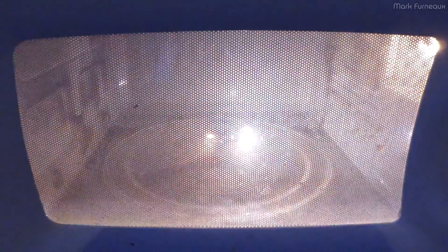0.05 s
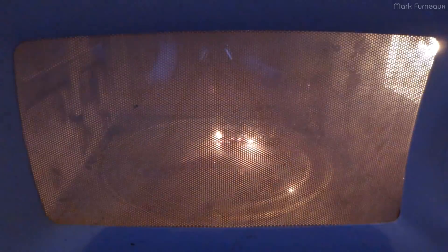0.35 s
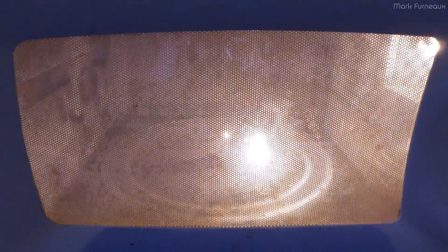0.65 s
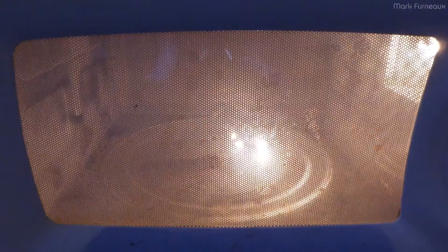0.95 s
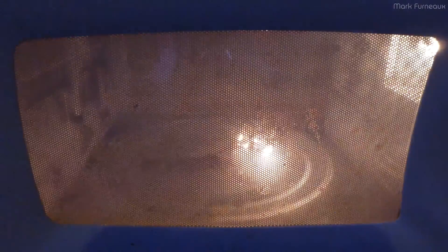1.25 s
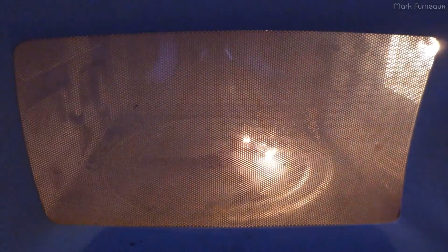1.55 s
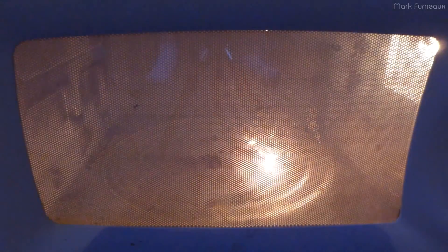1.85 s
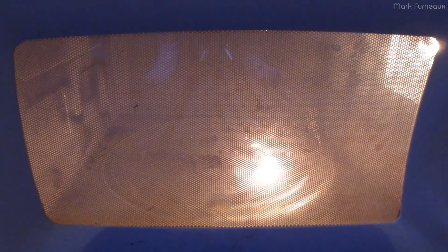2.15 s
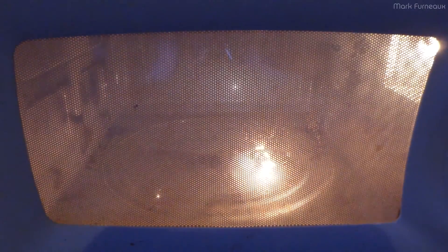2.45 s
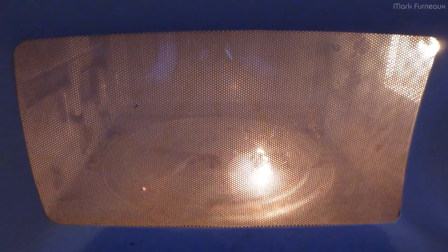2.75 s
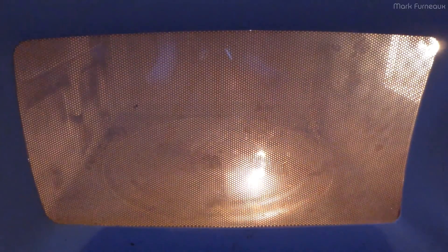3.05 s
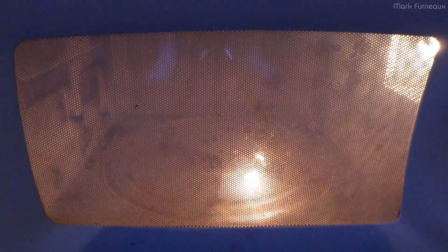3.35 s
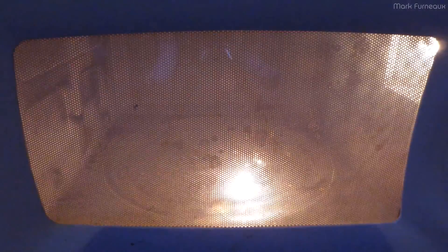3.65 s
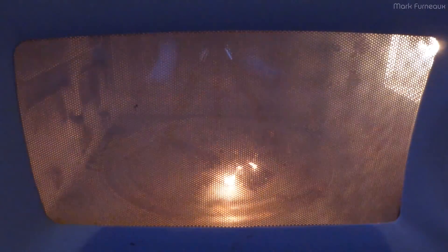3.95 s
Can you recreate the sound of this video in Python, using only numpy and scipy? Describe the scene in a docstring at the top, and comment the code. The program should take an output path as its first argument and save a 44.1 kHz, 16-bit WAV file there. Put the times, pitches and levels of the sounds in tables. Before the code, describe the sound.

Sparks crackle loudly inside a microwave oven right at the start, close up, each snap sizzling and ringing the steel interior. A shorter burst comes at about 0.5 seconds and another from 1.0 to 1.2. The fan rushes and the motor hums throughout. A faint tick follows at 2.5 seconds, then one hard pop near 3.5, and two small spits just before the end at 4 seconds.

```python
"""A burst of sparks crackles in a microwave oven, close up, over its rushing fan and the hum of its
motor and transformer. Metal on the turntable arcs in short bursts, one spark per mains cycle.
Each spark cracks, sizzles, thumps and rings the steel cavity, whose modes are struck differently as
the turntable carries the metal round. Later the metal only spits and gives one hard pop."""
import sys
import numpy as np
from scipy import signal
from scipy.fft import rfft, irfft, next_fast_len
from scipy.io import wavfile
from scipy.ndimage import uniform_filter1d, minimum_filter1d, map_coordinates

SR = 44100
rng = np.random.default_rng(int(sys.argv[2]) if len(sys.argv) > 2 else 0)


def generate_wav(signal):
    """Clip the signal to [-1, 1] and save it as 16-bit WAV at the path in sys.argv[1]."""
    frames = np.transpose(np.atleast_2d(signal))
    scaled = np.clip(frames, -1, 1) * 32767
    pcm = np.round(scaled).astype(np.int16)
    wavfile.write(sys.argv[1], SR, pcm)


N = 176400


def amp(db):
    """Decibels to gain."""
    return 10 ** (np.asarray(db) / 20)


def unit_rms(x):
    """Scale to rms 1."""
    return x / np.sqrt(np.mean(x ** 2) + 1e-20)


def wobble(rate):
    """A smooth random modulator with `rate` knots a second."""
    knots = rng.standard_normal(int(N * rate / SR) + 4)
    return map_coordinates(knots, [np.arange(N) * rate / SR])


def noise(colour, size, resonances=()):
    """Noise of rms 1, shaped by an EQ curve and optional bell resonances."""
    hz = np.fft.rfftfreq(size, 1 / SR)
    curve_hz, curve_db = np.transpose(colour)
    db = np.interp(np.log(hz + 1), np.log(curve_hz + 1), curve_db)
    for centre, width, lift in resonances:
        db += lift / (1 + (2 * (hz - centre) / width) ** 2)
    return unit_rms(irfft(rfft(rng.standard_normal(size)) * amp(db), size))


def add(track, start_s, sound):
    """Mix a sound into the track at its cue."""
    part = track[round(start_s * SR):][:len(sound)]
    part += sound[:len(part)]


def attack(t, rise_s=0.00012):
    """An onset envelope, click-sharp by default."""
    return 1 - np.exp(-t / rise_s)


# Colour of the rushing air (frequency [Hz], level [dB])
FAN_COLOUR = [(20, -30), (35, -28), (55, -17.5), (72, -19), (95, -18.5), (122, -4.5), (140, -5),
              (160, -9.5), (200, -4.5), (240, -8.5), (300, -10.5), (400, -15), (560, -14), (900, -19),
              (1300, -21), (2300, -28), (2800, -31.5), (5000, -42), (9500, -50), (12500, -60), (14000, -71),
              (15500, -92)]
# Casing resonances that shape the rush (frequency [Hz], width [Hz], gain [dB])
CASING_RESONANCES = [(134.4, 9.5, 2.5), (183.4, 15, 4), (235, 37, -8), (271, 17, 2.5), (556, 31, 3.5),
                     (690, 40, 2), (907, 130, 2.5), (2330, 160, 0)]

def fan():
    """Air rushes through the casing, fluttering a little."""
    level_db = -27 + 0.78 * wobble(24.85)
    return amp(level_db) * noise(FAN_COLOUR, N, CASING_RESONANCES)


# Tones of the hum (frequency [Hz], level [dB], level wobble [dB], phase wander [rad])
HUM_TONES = [(67.1, -43.5, 4, 0.42), (120.2, -39.2, 7.5, 0.47), (202.4, -38, 1.5, 0.6),
             (235, -29.5, 1.5, 0.13), (240.9, -45, 9.5, 0.11), (353.7, -41, 2.5, 0.9),
             (788.4, -48, 2.5, 0.87), (1060, -50, 5, 0.47), (1121, -52.5, 5, 0.7), (2297, -51, 2, 0.28)]

def hum():
    """The fan motor, transformer and panels drone in unsteady tones."""
    out, t = np.zeros(N), np.arange(N) / SR
    for hz, db, sway_db, wander in HUM_TONES:
        sway = amp(sway_db * wobble(10))
        phase = 2 * np.pi * hz * t + wander * wobble(9)
        out += amp(db) * unit_rms(sway * np.sin(phase))
    return out


# Fader ride on the fan and hum together (time [s], level [dB])
BED_RIDE = [(0, 4.5), (.16, -5), (.3, -1), (.65, -1), (1, -0.5), (1.25, -1.5), (1.5, -1.5), (1.7, -0.4),
            (2.4, 0.46), (2.95, 1.2), (3.4, 2), (3.65, 0.5), (4, 2)]

def running_oven():
    """The bed of fan and hum starts loud, dips briefly, then holds with a gentle swell."""
    ride_db = np.interp(np.arange(N) / SR, *np.transpose(BED_RIDE))
    return amp(ride_db) * (fan() + hum())


def arc_noise(t, colour, tail_db, t60, burn_s=0.0019, rise_s=0.00012, quench_s=0.0027):
    """Noise that holds while the arc burns, then echoes round the cavity."""
    direct = np.exp(-np.maximum(t - burn_s, 0) / quench_s)
    echo = amp(tail_db - 60 * t / t60)
    return noise(colour, len(t)) * attack(t, rise_s) * np.hypot(direct, echo)


# Modes of the sparking metal (ratio to the crack's pitch, t60 [s], level against the crack [dB])
METAL_MODES = [(1, .045, -5), (1.17, .04, -7), (1.43, .035, -18), (2.12, .045, -20)]

def metal_ping(t, crack_hz):
    """The metal's own few modes, dying within a mains cycle or two."""
    modes = sum(amp(db - 60 * t / t60) * np.sin(2 * np.pi * (ratio * crack_hz * t + rng.random()))
                for ratio, t60, db in METAL_MODES)
    return attack(t, rise_s=0.00093) * modes


# Modes of the steel cavity (frequency [Hz], t60 [s], level at first [dB], level once turned [dB])
CAVITY_MODES = [(491.7, 0.2, -8.5, -6.5), (787, 0.21, -12, -5.5), (930, 0.22, -13, -2.5),
                (1362, 0.28, -11.5, -11), (1709, 0.29, -22, -13), (2268, 0.2, -28, -4.5),
                (2510, 0.16, -24, -8.5), (2802, 0.17, -4.5, -4), (2886, .17, -19, -9),
                (3065, 0.17, -1.5, -4), (3110, 0.15, -0.5, -4), (3290, 0.15, -10, -10),
                (3520, 0.12, -9, -8), (3630, 0.15, -5, -24), (3685, 0.16, -5, -22), (3882, 0.17, -11, -11)]

def cavity_ring(t, start_s, turn_s=1, scatter_db=1.5):
    """The cavity rings; its balance of modes shifts as the turntable moves the metal to a second spot."""
    hz, t60, first_db, turned_db = np.transpose(CAVITY_MODES)[:, :, None]
    turned = min(start_s / turn_s, 1)
    db = first_db + (turned_db - first_db) * turned + scatter_db * rng.standard_normal(hz.shape)
    phase = 2 * np.pi * (hz * t + rng.random(hz.shape))
    return (amp(db - 60 * t / t60) * np.sin(phase)).sum(0) * attack(t)


# Spark cues (time [s], crack level [dB], crack pitch [Hz], ring level [dB], clang level [dB],
# thump level [dB], sizzle level [dB], sizzle tilt [dB/octave])
SPARK_CUES = [(.0005, -24, 3140, -22, -26.5, -27, -32, -1), (0.0185, -23, 3150, -25, -34, -24, -30.5, -1.5),
              (.034, -17.5, 3120, -22, -27, -22.5, -34, -1), (0.0519, -21, 3200, -26, -27, -24, -32.5, 4),
              (0.0672, -10, 3150, -17, -26.5, -25, -34.5, 2), (.085, -22, 3200, -30, -30, -20, -44, -4),
              (0.4687, -22, 2940, -20, -34, -27, -28, 0), (.485, -24, 2980, -21.5, -30, -16.5, -28, -2.5),
              (.501, -27, 3100, -29, -37, -31, -31, -2), (1.0503, -22.5, 2980, -25.5, -25, -19, -28, -2),
              (1.067, -27, 2870, -25, -26, -15, -34, 1), (1.117, -27, 3050, -24, -25, -26, -29, 0),
              (1.1338, -20.5, 3050, -24, -29, -27, -29.5, -1), (1.184, -32, 3200, -37, -36, -32, -30, 3.5)]
# Colours of the sharp crack, mid clang, low thump and bright sizzle (frequency [Hz], level [dB])
CRACK_COLOUR = [(1200, -25), (1900, -18), (2350, -10), (2750, 0.5), (3100, 0.5), (3550, -7), (3950, -8),
                (4400, -17), (8000, -30)]
CLANG_COLOUR = [(200, -16), (450, -13), (900, -3), (1700, 6), (2400, -3), (3500, 5.5), (6000, -35)]
THUMP_COLOUR = [(20, -60), (60, -28), (95, -19), (128, 8), (160, -0.5), (200, -3), (300, -10), (550, -19),
                (1200, -45)]
SIZZLE_COLOUR = [(1500, -30), (3500, 2), (4500, -1), (6000, -1.7), (8000, -3.8), (10000, -8),
                 (13000, -12.5), (14500, -20), (15500, -36)]
CRACK_HZ = 3120  # pitch of the untransposed crack

def sparks():
    """Each arc cracks, rings the metal and cavity, thumps the air and fills the cavity with sizzle."""
    out, t = np.zeros(N), np.arange(SR // 3) / SR
    for start_s, crack_db, crack_hz, ring_db, clang_db, thump_db, sizzle_db, tilt in SPARK_CUES:
        transposed = [(hz * crack_hz / CRACK_HZ, db) for hz, db in CRACK_COLOUR]
        tilted = [(hz, db + tilt * np.log2(hz / CRACK_HZ)) for hz, db in SIZZLE_COLOUR]
        snap = arc_noise(t, transposed, tail_db=-11, t60=0.13, burn_s=0.0033)
        crack = amp(crack_db - 1) * (snap + metal_ping(t, crack_hz))
        ring = amp(ring_db) * cavity_ring(t, start_s)
        clang = amp(clang_db) * arc_noise(t, CLANG_COLOUR, tail_db=-2, t60=0.27)
        thump = amp(thump_db) * arc_noise(t, THUMP_COLOUR, tail_db=-2, t60=0.15, rise_s=0.0025)
        sizzle = amp(sizzle_db) * arc_noise(t, tilted, tail_db=2.5, t60=0.2, rise_s=0.0024)
        add(out, start_s, crack + ring + clang + thump + sizzle)
    return out


# Spit cues (time [s], tick level [dB], crack level [dB])
SPIT_CUES = [(.418, -51, -58), (.586, -60, -45), (2.526, -46, -60), (3.68, -46, -34.5), (3.794, -51, -46)]
# Colour of a spit's thin tick (frequency [Hz], level [dB])
TICK_COLOUR = [(2000, -12), (4000, 0), (8000, 4), (12000, 0), (14500, -10), (15500, -32)]

def spits():
    """Faint, brief arcs give only a tick and a small crack."""
    out, t = np.zeros(N), np.arange(SR // 3) / SR
    for start_s, tick_db, crack_db in SPIT_CUES:
        tick = amp(tick_db) * arc_noise(t, TICK_COLOUR, tail_db=-2.5, t60=0.21, burn_s=0.001)
        crack = amp(crack_db) * arc_noise(t, CRACK_COLOUR, tail_db=-2, t60=0.32, burn_s=0.0017)
        add(out, start_s, tick + crack)
    return out


# Modes of the metal and casing struck by the pop (frequency [Hz], t60 [s], level [dB])
POP_RING = [(147, 0.081, -10), (265, .04, -13), (497, 0.052, -14), (1340, .04, -27), (2735, 0.021, -8),
            (3730, .12, -28.5), (3950, .022, -26), (4300, 0.04, -30), (5870, 0.023, -23.5)]
# Colour of the pop's hiss (frequency [Hz], level [dB])
POP_COLOUR = [(700, -2), (1400, 1), (2200, -4), (2700, 8), (3200, -3), (3900, 5), (4800, -4.5), (5600, -1),
              (6700, -11), (11000, -13.5), (14000, -19), (15500, -40)]

def pop(start_s=3.4503, rise_s=0.0013):
    """A single hard discharge: one low push, a short bright ping and a puff of hiss."""
    out, t = np.zeros(N), np.arange(SR // 3) / SR
    modes = sum(amp(db - 60 * t / t60) * np.sin(2 * np.pi * hz * t) for hz, t60, db in POP_RING)
    hiss = arc_noise(t, POP_COLOUR, tail_db=0, t60=0.21, burn_s=0.0027, rise_s=rise_s)
    add(out, start_s, modes * attack(t, rise_s) + amp(-28.5) * hiss)
    return out


def scene():
    """The oven sits dead centre, the same in both channels."""
    return np.tile(running_oven() + sparks() + spits() + pop(), (2, 1))


def record(dry):
    """The microphone rolls off the deep bass; a peak limiter and a steep high cut follow."""
    low_cut_hz, ceiling_db, hold = 50, -5, round(0.0021 * SR)
    top_hz, edge_hz = 15800, 800
    lean = signal.sosfilt(signal.butter(4, low_cut_hz, "high", fs=SR, output="sos"), dry)
    needed_gain = np.minimum(1, amp(ceiling_db) / (np.abs(lean).max(0) + 1e-9))
    limited = lean * uniform_filter1d(minimum_filter1d(needed_gain, hold), hold)
    size = next_fast_len(N + SR // 2)
    edge = np.clip((top_hz - np.fft.rfftfreq(size, 1 / SR)) / edge_hz, 0, 1)
    high_cut = np.sin(np.pi / 2 * edge) ** 2
    return irfft(rfft(limited, size) * high_cut, size)[:, :N]


dry = scene()
out = record(dry)
generate_wav(out)
```